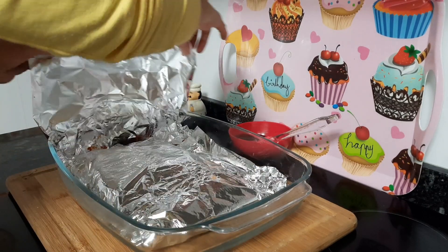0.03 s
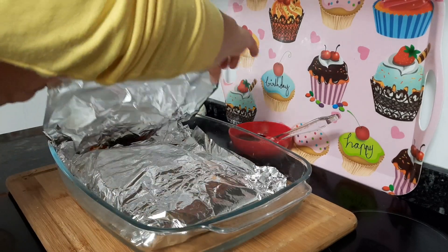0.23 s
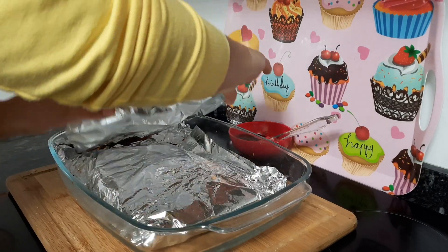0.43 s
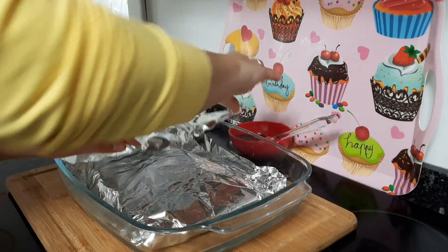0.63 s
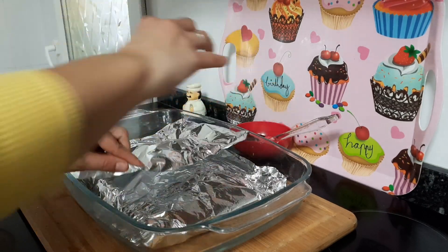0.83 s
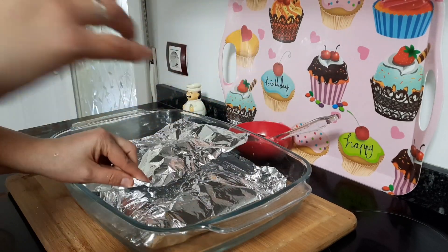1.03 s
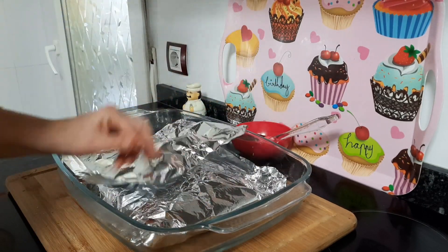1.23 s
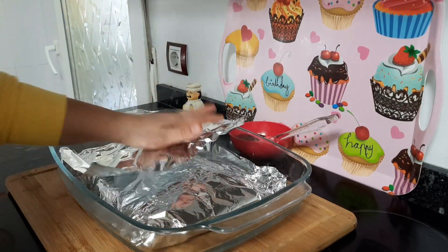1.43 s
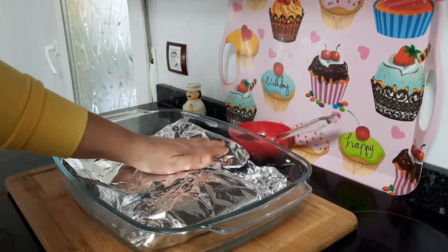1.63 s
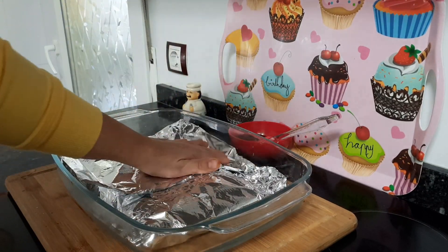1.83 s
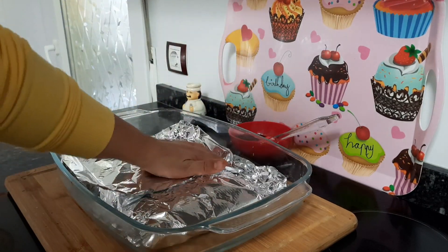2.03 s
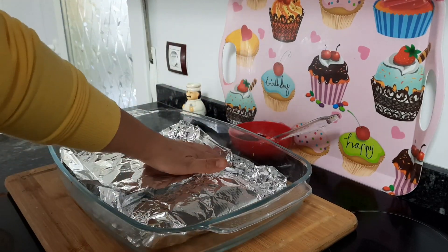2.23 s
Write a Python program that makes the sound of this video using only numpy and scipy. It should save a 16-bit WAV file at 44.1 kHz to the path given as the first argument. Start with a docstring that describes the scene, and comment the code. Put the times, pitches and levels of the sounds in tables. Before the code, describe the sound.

Aluminium foil crackles and rustles close by as it is lifted and folded over a glass dish. After a brief pause it crinkles again, patted flat, with faint dull bumps of the dish in a small kitchen.

```python
"""A bright, crackling rustle: aluminium foil is lifted, folded over a glass dish, then patted flat.
Many tiny creases buckle, and each rings its own small patch of the sheet; now and then a whole fold
gives way in a run of snaps. Larger panels flex with a lower rattle or pop through, the loose sheet puffs
air, its edge rasps on the rim, and hands bump the dish. The small tiled kitchen adds a short echo
and a faint rumble."""
import sys
import numpy as np
from scipy import signal
from scipy.fft import rfft, irfft
from scipy.io import wavfile

SR = 44100
rng = np.random.default_rng(int(sys.argv[2]) if len(sys.argv) > 2 else 0)


def generate_wav(sig):
    """Save sig (samples, or channels by samples) to the path in sys.argv[1] as 16-bit PCM at SR."""
    pcm = np.round(np.clip(np.atleast_2d(sig).T, -1, 1) * 32767).astype(np.int16)
    wavfile.write(sys.argv[1], SR, pcm)


N = 100239

# Tone of the kitchen's rumble: pitch_hz, level_db
RUMBLE_TONE = [(25, -39), (55, -11.5), (98, 5.5), (140, -5.5), (200, -14.5), (320, -8), (1100, -26),
               (2200, -28), (5000, -26), (16000, -33)]
# Tone of the kitchen's echo: pitch_hz, level_db
ECHO_TONE = [(60, -7.5), (300, -3), (1100, -1), (2200, 4), (16000, -2.5)]
# The loose sheet swings through the air: peak_s, level_db, half_length_s
SHEET_SWINGS = [(0.023, -55, 0.11), (0.197, -51, 0.013), (0.273, -55, 0.052), (0.52, -51, 0.028),
                (0.813, -56, 0.021), (1.167, -62, 0.043), (1.57, -63.5, 0.041)]
# Tone of the air it moves: pitch_hz, level_db
AIR_TONE = [(30, -15), (100, 5), (220, -5.5), (320, 6.5), (420, 4.5), (2000, -39)]
# Hands bump the dish: start_s, level_db, extra_bass_db
DISH_BUMPS = [(0.172, -45.5, 5.5), (0.463, -63, -5), (0.499, -49.5, 9.5), (0.841, -48.5, -15),
              (0.934, -46.5, -19), (1.569, -53.5, -8)]
# Notes of the dish on its board: pitch_hz, level_db, fade_s (a fade is the time to fall by 60 dB)
DISH_NOTES = [(93, -5.5, 0.2), (131, 0.5, 0.043), (306.6, -1.5, 0.37), (342, 0, 0.12), (644, -7.5, 0.53)]
# A light tap on the glass rim: start_s, level_db
RIM_TAPS = [(0.947, -44)]
# Notes of the rim: pitch_hz, level_db, fade_s
RIM_NOTES = [(1879, 2, .5), (1945, 4, .11)]
# Foil rasps along the rim, and one brief tick at 1.409 s: start_s, pitch_hz, level_db, fade_s
RIM_SCRAPES = [(0.999, 1760, -44.5, 0.33), (1.054, 1250, -40.5, 0.18), (1.409, 2070, -58.5, 0.061),
               (2.136, 750, -41, 0.13)]
# Panels snap through: start_s, pitch_hz, level_db
PANEL_POPS = [(0.496, 1110, -35.5), (0.78, 1950, -36), (0.844, 1430, -36), (0.866, 1630, -35),
              (1.058, 1700, -35.5), (1.115, 1590, -38), (1.41, 2900, -57.5), (2.099, 5800, -30.5),
              (2.135, 2680, -33.5)]
# Tone of the flexing panels: pitch_hz, level_db
PANEL_TONE = [(40, -22.5), (90, -11.5), (160, -2.5), (250, -17), (305, 2.5), (480, 1), (780, 8),
              (1400, -2.5), (2200, -11), (4000, -1), (9000, -31)]
# Stereo width of the panels, as side level against middle level: pitch_hz, level_db
PANEL_WIDTH = [(100, -27), (330, -10), (700, -6.5), (1300, 3.5)]
# How hard the foil is worked while lifting it: time_s, crinkle_db, panel_db
LIFTING = [(0, -37, -51), (.05, -41.5, -54), (.145, -38.5, -53), (.165, -47.5, -54.5), (.2, -37.5, -54.5),
           (.243, -35.5, -45), (.305, -33.5, -50), (.355, -44, -50.5), (.385, -39, -49.5),
           (.435, -43, -52.5), (.468, -34, -44), (.505, -40.5, -43), (.55, -37.5, -52.5),
           (.615, -41.5, -54), (.68, -47.5, -60), (.74, -58, -68)]
# While folding it over: time_s, crinkle_db, panel_db
FOLDING = [(0.759, -42, -58.5), (0.784, -40, -45.5), (.815, -40.5, -49), (.85, -33.5, -43),
           (.89, -34.5, -48), (0.947, -37, -44.5), (.995, -41.5, -53), (1.06, -39.5, -55),
           (1.1, -45.5, -54.5), (1.14, -36, -55), (1.175, -39.5, -50.5), (1.234, -40, -49),
           (1.279, -51.5, -66), (1.31, -71, -81), (1.37, -71, -95), (1.465, -81, -94)]
# While patting it flat: time_s, crinkle_db, panel_db
PATTING = [(1.479, -56, -76.5), (1.529, -38.5, -57.5), (1.565, -35.5, -48), (1.636, -34.5, -48),
           (1.681, -41.5, -57), (1.785, -37, -53), (1.823, -39.5, -56.5), (1.89, -36.5, -49.5),
           (1.939, -39, -55.5), (2.01, -35.5, -51.5), (2.05, -36.5, -55.5), (2.078, -40.5, -60.5),
           (2.135, -39.5, -49), (2.18, -46.5, -59), (2.27, -73, -71.5)]
# Whole folds give way: start_s, level_db, rough_length_s
FOLD_RUNS = [(0.105, -31, 0.0075), (0.135, -31.5, 0.014), (0.172, -25, 0.0035), (0.211, -35, 0.011),
             (0.281, -26.5, 0.012), (0.318, -30, 0.013), (0.489, -26, 0.015), (0.746, -34.5, 0.0056),
             (0.765, -29, 0.0038), (0.778, -25.5, 0.0064), (0.835, -24, 0.0087), (0.867, -27.5, .005),
             (1.011, -29.5, 0.0067), (1.061, -29.5, .009), (1.117, -31, 0.01), (1.141, -34, 0.0072),
             (1.201, -30.5, .008), (1.324, -45, 0.0066), (1.345, -39, 0.0043), (1.473, -40, 0.0091),
             (1.502, -32, 0.0072), (1.543, -31, 0.015), (1.567, -28.5, 0.0077), (1.598, -25, 0.0084),
             (1.700, -26.5, 0.0073), (1.782, -27.5, 0.0071), (1.800, -36, 0.0059), (2.015, -27, 0.0055),
             (2.109, -27.5, 0.0031), (2.135, -28, 0.0044), (2.150, -28, 0.0035)]
# Extra brightness of those folds: pitch_hz, level_db
FOLD_BRIGHTNESS = [(2500, -3), (12000, 2)]
# Single sharp creases: start_s, level_db
LONE_SNAPS = [(0.369, -5), (0.898, -13), (1.837, -6.5), (2.0206, -10), (2.1003, -7.5)]
# Tone shared by creases, folds and snaps: pitch_hz, level_db
CRINKLE_TONE = [(300, -28.5), (800, -15), (1500, -3.5), (2200, -2.5), (8000, 0), (16000, -0.5)]
# Tone of the two microphone openings: pitch_hz, left_db, right_db
MIC_TONE = [(100, -1, 0), (400, 1.5, -2.5), (1000, 0, -2.5), (1900, 1, -2), (3500, .5, -1), (5000, -1, .5),
            (6500, -.5, 2.2), (8800, 1.8, -1.2), (9800, 1, -7.3), (10700, 3, -5.8), (11500, 5, -2.3),
            (12900, 4.5, -.3), (14500, .8, 0), (15800, -1, 0)]

RUMBLE_DB, TOP_HZ = -67.5, 15850
ECHO_DB, ECHO_FADE_S, ECHO_TREBLE_FADE_S, ECHO_GAP_S = -4, 0.36, 0.3, 0.0028
PATCHES_IN_PLAY, PATCHES_PER_S, PATCH_RISE_S = 16, 380, .0002
BUSY_DB = -38.5  # handling level at which the next two click rates apply
FLEXES_PER_S, CREASES_PER_S = 1200, 2200
PANEL_DB, CREASE_DB, FOLD_DB, SNAP_DB = 0.5, 3, -2, -2.5
BOUNCE_DB, BOUNCE_MAX_DELAY_S, BOUNCE_MOVES_PER_S = -14, .0012, 14


def gain(db):
    """Turn decibels into a number to multiply by."""
    return 10 ** (np.asarray(db) / 20)


def unit_energy(x):
    """Scale each channel so that its energy is 1."""
    return x / np.sqrt(np.sum(x ** 2, axis=-1, keepdims=True))


def prompt_filter(db):
    """A filter that responds as early as it can (minimum phase), from levels at evenly spaced pitches."""
    cepstrum = irfft(np.log(gain(db)))
    half = len(cepstrum) // 2
    cepstrum[1:half] *= 2
    cepstrum[half + 1:] = 0
    return irfft(np.exp(rfft(cepstrum)))


def tone(points, size=4096):
    """Make a filter from rows of pitch_hz, level_db."""
    hz, db = np.array(points, float).T
    grid_hz = np.linspace(1, SR / 2, size + 1)
    return prompt_filter(np.interp(np.log(grid_hz), np.log(hz), db))


def through(x, response):
    """Send one or two channels through a filter."""
    return signal.fftconvolve(np.atleast_2d(x), np.atleast_2d(response), axes=1)[:, :N]


def room_rumble():
    """The kitchen rumbles low and steady, nearly the same on both sides."""
    noise = rng.standard_normal(N) + 0.37 * rng.standard_normal((2, N))
    return gain(RUMBLE_DB) * through(noise, unit_energy(tone(RUMBLE_TONE)))


def reflections(split_hz=4500):
    """Tiles and worktop throw back a dense echo; the treble dies first."""
    age = np.arange(SR // 2) / SR
    tail = 0
    for band, fade_s in (("low", ECHO_FADE_S), ("high", ECHO_TREBLE_FADE_S)):
        band_filter = signal.butter(2, split_hz, band, fs=SR, output="sos")
        noise = signal.sosfilt(band_filter, rng.standard_normal((2, len(age))))
        tail = tail + noise * gain(-60 * age / fade_s)
    return unit_energy(through(tail * (age > ECHO_GAP_S), tone(ECHO_TONE)))


def add_kitchen_echo(x, spots=4, hop_s=.012):
    """The sound hops between spots on the sheet, and each spot has its own echo."""
    hop = np.arange(N) / SR / hop_s
    shares = [np.maximum(1 - abs((hop - k) % spots - 1), 0) for k in range(spots)]
    return x + gain(ECHO_DB) * sum(through(x * share, reflections()) for share in shares)


def air_puffs():
    """The swinging sheet pushes air in soft, low puffs."""
    t = np.arange(N) / SR
    swing = sum(gain(db) * np.exp(-.5 * ((t - peak) / width) ** 2) for peak, db, width in SHEET_SWINGS)
    return swing * through(rng.standard_normal(N), unit_energy(tone(AIR_TONE)))


def struck(start, notes, rise_s):
    """A soft contact sets an object's own notes ringing, and each fades away."""
    age = np.maximum(np.arange(N) / SR - start, 0)
    ring = sum(gain(db - 60 * age / fade_s) * np.sin(2 * np.pi * (hz * age + rng.random()))
               for hz, db, fade_s in notes)
    return ring * (1 - np.exp(-age / rise_s))


def dish_knocks(bass_below_hz=200):
    """The dish knocks dully on a wooden board; each knock has its own amount of bass."""
    knocks = 0
    for start, db, bass_db in DISH_BUMPS:
        notes = [(hz, level + bass_db * (hz < bass_below_hz), fade) for hz, level, fade in DISH_NOTES]
        knocks = knocks + gain(db) * struck(start, notes, rise_s=0.0026)
    return knocks


def rim_tap():
    """The glass rim rings under a light tap."""
    return sum(gain(db) * struck(start, RIM_NOTES, rise_s=0.00062) for start, db in RIM_TAPS)


def burst(start, hz, db, fade_s, width):
    """A rough, quickly fading vibration around one pitch; width is a share of that pitch."""
    age = np.maximum(np.arange(N) / SR - start, 0)
    band = signal.butter(2, [hz * (1 - width), hz * (1 + width)], "band", fs=SR, output="sos")
    rough = signal.sosfilt(band, rng.standard_normal((2, N)))
    return rough / rough.std() * gain(db - 60 * age / fade_s) * (age > 0)


def rim_scrapes():
    """The edge of the foil catches on the rim in short rasps; one brief tick sounds as well."""
    return sum(burst(start, hz, db, fade_s, width=.15) for start, hz, db, fade_s in RIM_SCRAPES)


def panel_pops():
    """A whole panel snaps through with a hollow crack; the larger the panel, the lower."""
    return sum(burst(start, hz, db, fade_s=.055, width=.38) for start, hz, db in PANEL_POPS)


def foil_patch(ring_s, crack, alike, uneven_db, size=1024, tone_points=40):
    """One patch of foil cracks and rings briefly in its own tone; alike adds ring common to both sides."""
    age = np.arange(size) / SR
    noise = rng.standard_normal((2, size)) + alike * rng.standard_normal(size)
    rise = 1 - np.exp(-(age + 1 / SR) / PATCH_RISE_S)
    decay_s = ring_s * np.exp(rng.uniform(-0.25, 1) / 2)
    ring = unit_energy(noise * rise * np.exp(-age / decay_s))
    ring[[0, 1], rng.choice(6, 2)] += crack  # reaches left and right up to 5 samples apart
    pitches = np.linspace(0, 1, tone_points) ** 2
    levels_db = uneven_db * rng.standard_normal(tone_points)
    own_tone = prompt_filter(np.interp(np.linspace(0, 1, size // 2 + 1), pitches, levels_db))
    return unit_energy(signal.fftconvolve(ring, own_tone[None]))


def buckle(times, sizes, patches, **patch_settings):
    """Each click rings one patch; the choice moves on as the bend travels, so the tone shifts."""
    sound = 0
    chosen = (np.arange(len(times)) % PATCHES_IN_PLAY + (times * PATCHES_PER_S).astype(int)) % patches
    samples = np.clip(times * SR, 0, N - 1).astype(int)
    for k in range(patches):
        clicks = np.zeros(N)
        np.add.at(clicks, samples[chosen == k], sizes[chosen == k])
        sound = sound + signal.oaconvolve(clicks[None], foil_patch(**patch_settings), axes=1)[:, :N]
    return sound


def random_clicks(time_s, level_db, per_s, spread_db, slots=16000):
    """Times and sizes of clicks that come faster and stronger as the foil is worked harder."""
    times = (np.arange(slots) + rng.random(slots)) / slots * N / SR
    db = np.interp(times, time_s, level_db)
    rate = per_s * gain(db - BUSY_DB) ** .6
    chance = np.clip(rate * N / SR / slots, 0, 1)
    sizes = gain(spread_db * np.minimum(rng.exponential(size=slots), 3))
    sizes *= rng.choice([-1, 1], slots) / np.sqrt(np.mean(sizes ** 2))
    happens = rng.random(slots) < chance
    # The square root keeps the average level on the curve, however few the clicks.
    return times, sizes * happens * gain(db) * np.sqrt(N / slots / chance)


def panel_rattle(time_s, level_db):
    """Larger panels flex in and out with a lower rattle; its long waves reach both sides alike."""
    times, sizes = random_clicks(time_s, level_db, FLEXES_PER_S, spread_db=1)
    middle, side = buckle(times, sizes * gain(PANEL_DB), patches=16,
                          ring_s=0.0027, crack=0.27, alike=0, uneven_db=3)
    side = through(side, tone(PANEL_WIDTH))
    return through(middle + side * np.array([[1], [-1]]), unit_energy(tone(PANEL_TONE)))


def lone_snaps():
    """A single sharp crease gives one loud, dry snap."""
    times, db = np.array(LONE_SNAPS).T
    return buckle(times, gain(db + SNAP_DB), patches=5, ring_s=.0009, crack=.8, alike=.3, uneven_db=3)


def folds_giving_way(clicks=32):
    """Each fold sets off a bright run of clicks that quickly thickens, then thins out."""
    times, sizes = [], []
    for start, db, length_s in FOLD_RUNS:
        progress = (np.arange(clicks) + rng.random(clicks)) / (clicks + 1)
        times.append(start + length_s * (-np.log(1 - progress)) ** .7)  # a power below 1 gives a build-up
        size = unit_energy(rng.choice([-1, 1], clicks) * gain(0.83 * rng.standard_normal(clicks)))
        sizes.append(size * gain(db + FOLD_DB) * np.sqrt(length_s * SR))
    runs = buckle(np.concatenate(times), np.concatenate(sizes), patches=28,
                  ring_s=0.0023, crack=0.56, alike=0.14, uneven_db=6.0)
    return through(runs, tone(FOLD_BRIGHTNESS))


def tiny_creases(time_s, level_db):
    """Tiny creases buckle so often that their clicks blur into a rustle."""
    times, sizes = random_clicks(time_s, level_db, CREASES_PER_S, spread_db=4)
    return buckle(times, sizes * gain(CREASE_DB), patches=56,
                  ring_s=0.0027, crack=0.41, alike=0.2, uneven_db=4.5)


def add_sheet_bounce(x):
    """The sheet mirrors its own sound over a short, changing path, which adds a shifting hollow tone."""
    samples = np.arange(N)
    turns = np.arange(0, N + SR, SR / BOUNCE_MOVES_PER_S)
    delay = np.interp(samples, turns, rng.random(len(turns))) * BOUNCE_MAX_DELAY_S * SR
    mirrored = np.array([np.interp(samples - delay, samples, channel) for channel in x])
    return x + gain(BOUNCE_DB) * mirrored


def crinkle(time_s, level_db):
    """Creases, folds and snaps together make the bright sound of the foil."""
    crackle = tiny_creases(time_s, level_db) + folds_giving_way() + lone_snaps()
    return add_sheet_bounce(through(crackle, unit_energy(tone(CRINKLE_TONE))))


def scene():
    """Foil and rim echo in the kitchen; knocks, puffs and rumble lie underneath."""
    time_s, crinkle_db, panel_db = np.vstack([LIFTING, FOLDING, PATTING]).T
    foil = crinkle(time_s, crinkle_db) + panel_rattle(time_s, panel_db) + panel_pops()
    rim = rim_tap() + rim_scrapes()
    return add_kitchen_echo(foil + rim) + dish_knocks() + air_puffs() + room_rumble()


def record(dry):
    """Each microphone opening has its own tone; the highest treble is cut steeply."""
    mic = np.array(MIC_TONE)
    left, right = tone(mic[:, [0, 1]]), tone(mic[:, [0, 2]])
    treble_cut = signal.ellip(12, .1, 80, TOP_HZ, fs=SR, output="sos")
    return signal.sosfilt(treble_cut, through(dry, np.array([left, right])))


dry = scene()
out = record(dry)
generate_wav(out)
```